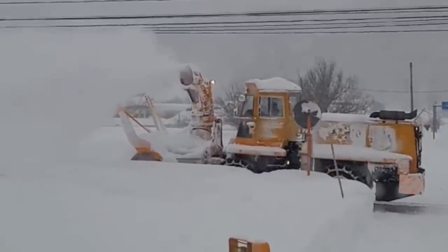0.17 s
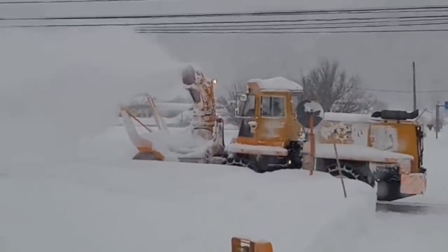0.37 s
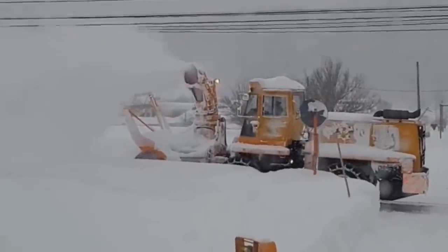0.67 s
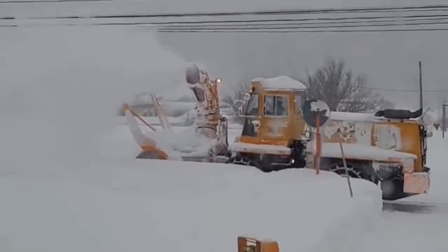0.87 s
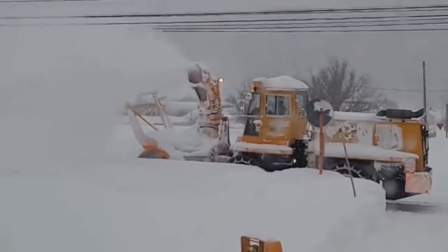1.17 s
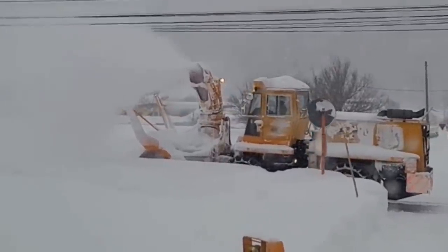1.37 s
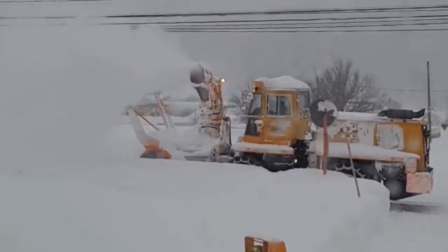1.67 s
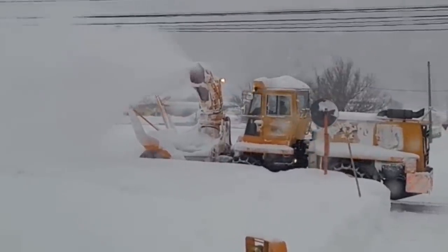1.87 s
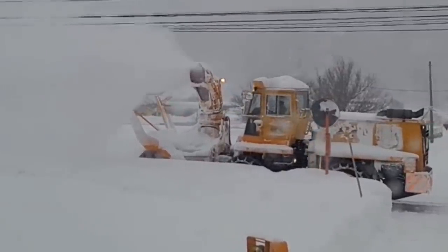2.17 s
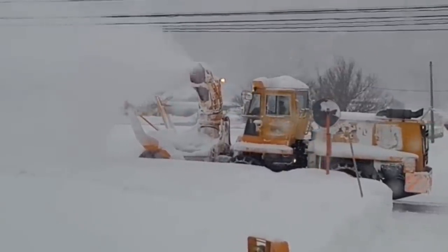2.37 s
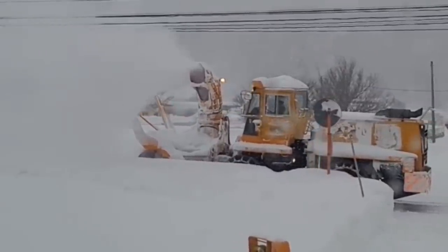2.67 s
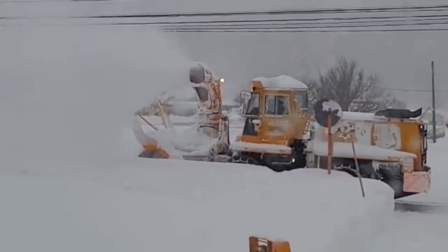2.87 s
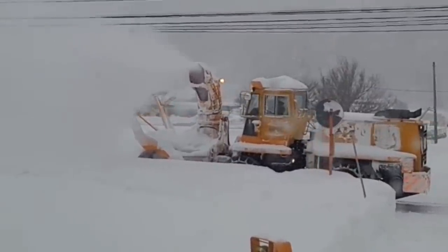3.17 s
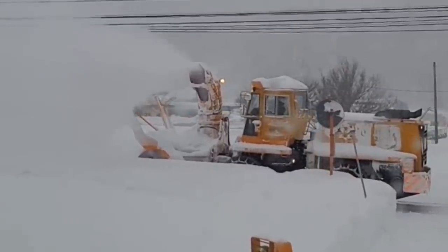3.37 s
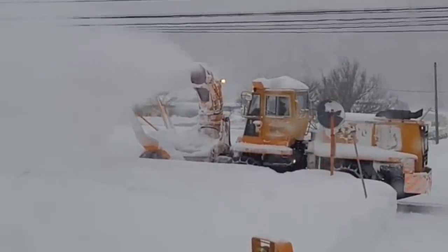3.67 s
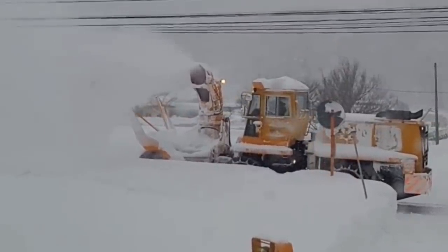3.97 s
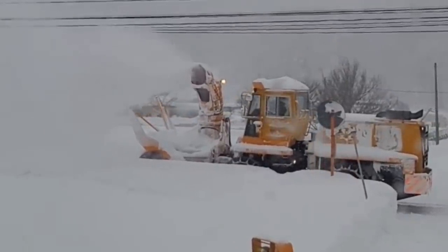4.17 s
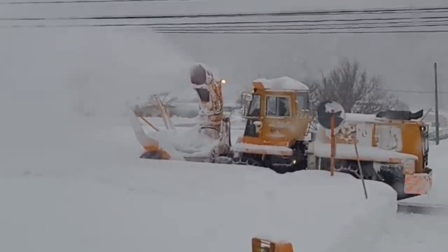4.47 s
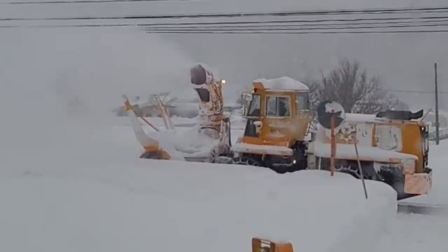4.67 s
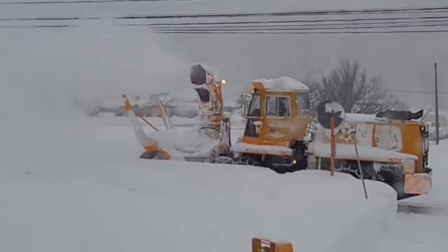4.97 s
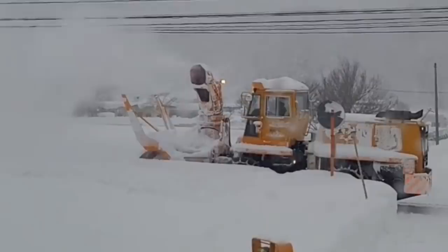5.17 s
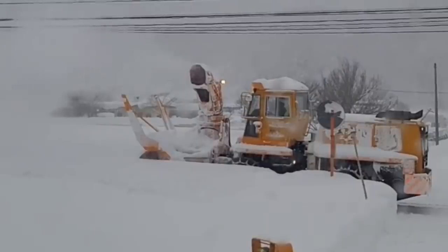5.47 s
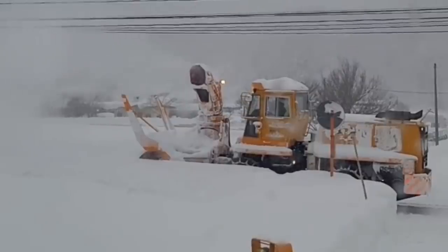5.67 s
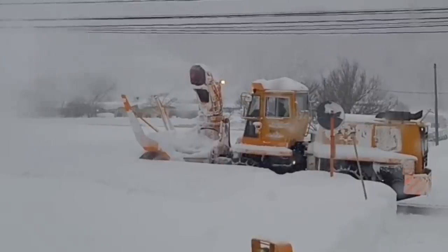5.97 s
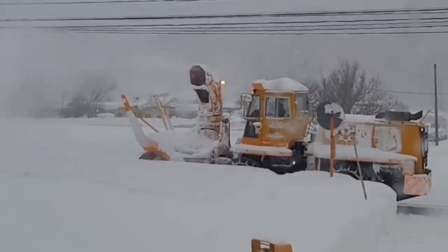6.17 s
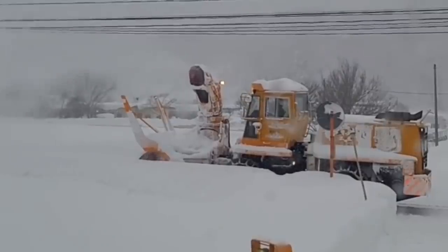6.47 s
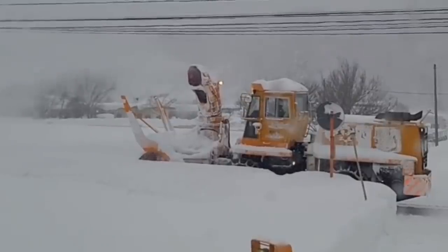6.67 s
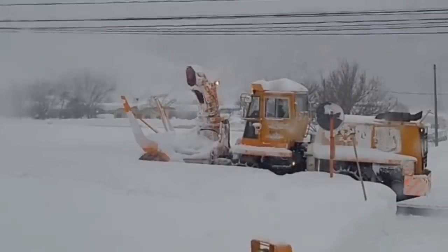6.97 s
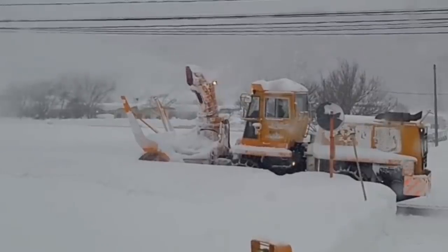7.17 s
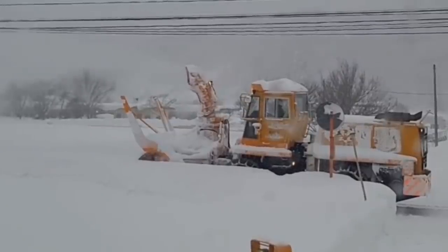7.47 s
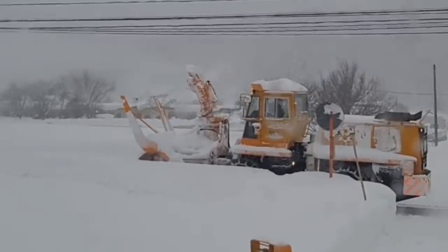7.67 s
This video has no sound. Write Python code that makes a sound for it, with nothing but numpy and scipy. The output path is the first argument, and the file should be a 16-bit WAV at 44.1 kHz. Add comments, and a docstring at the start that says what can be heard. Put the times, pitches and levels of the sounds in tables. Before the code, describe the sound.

Inside an idling car, a rotary snowblower's heavy diesel drones steadily outside with a soft roar of thrown snow, while the flasher relay ticks and tocks.

```python
"""From the start a rotary snowblower works at governed speed, heard from a waiting car: its
twelve-cylinder diesel drones as summed crank orders, with exhaust rumble and the roar and hiss of
thrown snow as coloured noise, while the impeller hums and a thin whine wavers. The car's idle throbs
against the drone five or six times a second. At once the flasher relay ticks, then tocks, as noise
bursts with a spring ring; from half a second on, stray snow grains tap faintly on the glass."""
import sys
import numpy as np
from scipy import signal
from scipy.fft import rfft, irfft, next_fast_len
from scipy.io import wavfile
from scipy.ndimage import uniform_filter1d, map_coordinates

SR = 44100
rng = np.random.default_rng(int(sys.argv[2]) if len(sys.argv) > 2 else 0)


def wav_out(sig):
    """Save sig, one row per channel (or a flat mono array), as 16-bit PCM at SR to the path in sys.argv[1]."""
    wavfile.write(sys.argv[1], SR, np.round(np.clip(np.atleast_2d(sig).T, -1, 1) * 32767).astype(np.int16))


N = 345303

# instant at which every running angle is zero, so both engines push nearly together
THROB_S = 3.366
# governed diesel speed (turns a second)
CRANK_HZ = 27.512
# course changes of each speed (knots a second)
STRAY_RATE_HZ = 1.2

# Standing waves in the cabin reach one side sooner.
# Each row: frequency in Hz, phase by which the left leads in radians.
PHASE_LEADS = [(40, 0.32), (105, 0.15), (150, -0.5), (160, 0.74), (165, 1.06), (177, -0.5), (215, -1.3),
               (230, 1), (290, -1), (340, 0.8), (400, -1.5), (460, -0.6), (495, -1.5), (530, 0),
               (660, 0.52), (720, -1.13), (1000, -2.5), (1300, -1.5), (2000, -1.7), (5000, 0)]


def amp(db):
    """Decibels to gain."""
    return 10 ** (np.asarray(db) / 20)


def unit(x):
    """x at rms 1."""
    return x / np.sqrt(np.mean(x ** 2) + 1e-20)


def along(points, hz):
    """(Hz, value) points interpolated on a log frequency axis."""
    point_hz, values = np.transpose(points)
    return np.interp(np.log(hz + 1), np.log(point_hz), values)


def colour(points, hz):
    """Gain of a (Hz, dB) spectrum that falls away steeply beyond its ends."""
    upper_skirt = 1 / np.hypot(1, (hz / (points[-1][0] * 1.15)) ** 8)
    lower_skirt = 1 / np.hypot(1, (points[0][0] * .8 / (hz + 1)) ** 4)
    return amp(along(points, hz)) * upper_skirt * lower_skirt


def filtered(x, response):
    """x times a response of frequency, applied by FFT."""
    n = x.shape[-1]
    m = next_fast_len(n + SR // 2)
    hz = np.fft.rfftfreq(m, 1 / SR)
    return irfft(rfft(x, m) * response(hz), m)[..., :n]


def wobble(rate_hz):
    """A smooth random curve, rate_hz knots a second."""
    at = np.linspace(0, rate_hz * N / SR, 2000)
    coarse = map_coordinates(rng.standard_normal(1000), [at], mode="wrap")
    return np.interp(np.arange(N), np.linspace(0, N, len(at)), coarse)


def curves(rows):
    """One value per sample for each column after the time."""
    s, *columns = np.transpose(rows)
    return [np.interp(np.arange(N) / SR, s, column) for column in columns]


def angle(hz, stray_hz):
    """Running angle in radians of something that turns at a nearly steady speed."""
    turns = np.cumsum(hz + stray_hz * wobble(STRAY_RATE_HZ)) / SR
    return 2 * np.pi * (turns - turns[round(THROB_S * SR)])


def pan(left_over_right_db):
    """Left and right gains for a level difference."""
    return amp(np.array([[left_over_right_db], [-left_over_right_db]]) / 2)


def tone(phase, side_db, flutter, rate_hz, lead_rad=0):
    """A stereo line, rms 1 before panning; scattered sound makes its level and phase flutter."""
    swell = flutter * wobble(rate_hz)
    slip = flutter * wobble(rate_hz)
    sides = np.array([phase + lead_rad / 2, phase - lead_rad / 2])
    return pan(side_db) * unit((1 + swell) * np.cos(sides) + slip * np.sin(sides))


def rush(spectrum, patchy_db):
    """Stereo noise of rms 1 with patches of random gain, coloured and spread by the cabin."""
    # Each row: frequency in Hz, left over right in dB.
    side_levels = [(40, -3.5), (150, -1), (215, -5.5), (290, -2.5), (370, 5), (460, -14), (750, -2.5),
                   (1300, -5), (1700, -9), (2200, 1.5), (3000, -1), (3900, -4), (5200, 1), (6800, -4),
                   (8000, 1), (10000, -4)]
    # Each row: frequency in Hz, left-right correlation (-1 to 1).
    alike = [(40, 0.96), (90, 0.9), (145, 0.86), (185, 0.54), (230, 0.8), (300, 1), (450, 0.59),
             (670, 0.53), (1000, 0.31), (2200, 0.15), (5000, 0.1), (11000, 0.29)]
    z = signal.stft(rng.standard_normal((2, N)), nperseg=512)[2]
    field = uniform_filter1d(rng.standard_normal(z.shape[1:]), size=6, axis=0)
    field = uniform_filter1d(field, size=14, axis=1)
    pair = signal.istft(z * amp(patchy_db * unit(field)), nperseg=512)[1][:, :N]

    def mid_side(hz):
        turn = np.arccos(np.clip(along(alike, hz), -1, 1)) / 2
        return colour(spectrum, hz) * np.array([np.cos(turn), np.sin(turn)])

    def cabin(hz):
        level = amp(np.outer([.5, -.5], along(side_levels, hz)))
        return level * np.exp(1j * np.outer([.5, -.5], along(PHASE_LEADS, hz)))

    mid, side = filtered(pair, mid_side)
    return unit(filtered(np.array([mid + side, mid - side]), cabin))


def standing_waves(hz, depth_db, spacing_hz):
    """Random peaks and dips from reflections on each side, nearing depth_db in the treble."""
    knots = rng.standard_normal((2, 2000))
    ripple = np.array([map_coordinates(k, [hz / spacing_hz], mode="wrap") for k in knots])
    return amp(depth_db * ripple * hz / (hz + 1500))


def diesel(crank, flutter=0.15, scatter_hz=520):
    """Crank orders: the shorter the wave, the more it flutters on its way into the cabin."""
    # Each row: multiple of crank speed, level in dB before scatter loss and swell, left over right in dB.
    orders = [(1.0, -56, -2.5), (1.5, -29.3, -1.8), (2.25, -56.5, -2), (3.0, -46.1, -0.3),
              (3.5, -47.9, -0.7), (4.25, -57, -1), (4.5, -50, -2.9), (5.5, -48.5, 0.3), (6.0, -41.6, -1.5),
              (6.5, -62, -3), (7.5, -60, -4), (8.5, -58.5, -7.6), (12.0, -45.6, -0.6), (14.5, -66, -1.8),
              (15.0, -66, -3), (16.0, -62, 1.7), (16.5, -65, -8.7), (18.0, -55.8, -5.4),
              (24.0, -55.8, -1.0), (30.0, -65, -1.4), (36.0, -75, -3.8), (37.5, -73, -4),
              (42.0, -60.5, -8.5), (43.5, -65, -9.6), (48.0, -55.5, -8.8), (49.5, -72, -6),
              (54.0, -67, -8.4), (56.0, -59.3, -9.2), (60.0, -69.5, -14.0), (66.0, -72, -5.5),
              (70.5, -70.6, -11.7), (72.0, -69.4, -1.9)]
    # Firing note and two overtones swell as the machine creeps on.
    # Each row: time in seconds, gains of orders 6, 12 and 18 in dB.
    swells = [(.2, 2.5, 2.2, 4), (.7, 2.5, 1.1, 1.5), (1.3, -1, 0.4, -0.5), (2, 1.7, -2.5, 4.5),
              (2.7, -3.5, 2.5, 3.5), (3.4, -1.5, 0.1, 1.5), (4.1, -2.5, -1.5, -7), (4.7, -1, -0.5, -5),
              (5.3, -3, 0.4, -11.5), (6, 5, -3.5, 4), (6.7, -4, 2, -1), (7.5, -1, -0.5, 5)]
    # Two strong high overtones fade in and out.
    # Each row: time in seconds, gains of orders 42 and 48 in dB.
    high_swells = [(.05, 7, 3), (.4, 8.5, 6), (.85, 5.5, -1.5), (1.15, 5, 1.5), (1.42, -5, 3.5),
                   (1.8, 6.5, -1.5), (2.2, 3.5, 0.5), (3, 2, 1.5), (4.1, -2.5, 1), (5, 3.5, 2.5),
                   (5.9, 2.5, 1), (6.4, 4.5, 1.5), (7.5, -0.5, 1.5)]
    swell_db = dict(zip((6, 12, 18, 42, 48), curves(swells) + curves(high_swells)))
    out = np.zeros((2, N))
    for multiple, db, side_db in orders:
        hz = multiple * CRANK_HZ
        scatter = hz / (hz + scatter_hz)
        if multiple < 2:
            spread_rad = 0  # deepest orders keep in step
        elif multiple >= 42 and multiple % 6 == 0:
            spread_rad = 1.5  # high firing overtones nearly so: they buzz
        else:
            spread_rad = np.pi
        phase = multiple * crank + spread_rad * rng.uniform(-0.99, 1)
        line = tone(phase, side_db, flutter * scatter, 2.426 + 9 * scatter, along(PHASE_LEADS, hz))
        out += amp(db - .5 * scatter + swell_db.get(multiple, 0)) * line
    return out


def exhaust(crank, depth=0.12):
    """Gas leaves the pipe in puffs, six to a turn of the crank, and booms in the cabin."""
    # Each row: frequency in Hz, relative density in dB per Hz.
    rumble = [(28, -21.5), (37, -12), (55, -10.5), (75, -9), (95, -3), (112, -8.5), (127, -10), (140, 1),
              (160, 3), (173, -15), (196, -15), (208, -9.5), (235, -9.5), (258, -5.5), (285, -13),
              (345, -8), (540, -33.5)]
    puffs = np.cos(6 * crank)
    return amp(-36.5) * unit((1 + depth * puffs) * rush(rumble, patchy_db=.5))


def snow(crank, rasp_depth=.045):
    """Auger, chute and flying snow roar and hiss with the load, rasping at the firing rate."""
    # Roar through the glass. Each row: frequency in Hz, relative density in dB per Hz.
    roar_colour = [(420, -24), (490, -18), (560, -27), (650, -22), (720, -24), (860, -20.5), (970, -24.5),
                   (1060, -26.5), (1170, -24), (1240, -18), (1300, -25.5), (1400, -27.5), (1455, -21.5),
                   (1505, -26.5), (1600, -18), (1745, -30), (1850, -26), (2010, -28.5), (2080, -35),
                   (2220, -32), (2500, -34), (2950, -36), (4150, -37.5), (4450, -50)]
    # Fine hiss. Each row: frequency in Hz, relative density in dB per Hz.
    hiss_colour = [(3800, -58), (4500, -50.5), (5250, -43), (5900, -55.5), (7000, -53.5), (8300, -61.5),
                   (9300, -67.5), (11000, -65), (12500, -68.5)]
    firing = 1 + rasp_depth * np.cos(6 * crank)
    load_db = 0.27 * wobble(1.5)
    roar = amp(-45.0 + load_db) * rush(roar_colour, patchy_db=1.0)
    hiss = amp(-70.0 + load_db) * rush(hiss_colour, patchy_db=1.5)
    return firing * filtered(roar + hiss, lambda hz: standing_waves(hz, depth_db=4, spacing_hz=32))


def impeller(blade_hz=104.05, stray_hz=.2):
    """The blades that throw the snow give one steady hum at their passing rate."""
    blades = angle(blade_hz, stray_hz)
    return amp(-38.0) * tone(blades, side_db=-2.0, flutter=0.035, rate_hz=1.4, lead_rad=0.11)


def whine(pitch_hz=1542, stray_hz=4):
    """A thin, wavering whine from the machine beats against the diesel's order 56."""
    phase = angle(pitch_hz, stray_hz)
    return amp(-60) * tone(phase, side_db=-6.0, flutter=0.22, rate_hz=6.4, lead_rad=-0.68)


def idle(firing_hz=35.648, stray_hz=.02, hunt_depth_hz=.1, hunt_period_s=7.3):
    """The car's firing note hunts slowly just under the diesel's order 1.5, so the two throb."""
    t = np.arange(N) / SR
    hunt_hz = hunt_depth_hz * np.sin(2 * np.pi * (t - THROB_S) / hunt_period_s)
    phase = angle(firing_hz + hunt_hz, stray_hz)
    return amp(-40.5) * tone(phase, side_db=-1.5, flutter=0.17, rate_hz=1.5, lead_rad=0.33)


def clicks(rows, spectrum, housing_t60_s, bounce_s, bounce_db, count=3):
    """The armature chatters, bounces once, and rings spring and housing, each blow a little different."""
    rise_s, chatter_s = .002, .003
    crack_db, crack_t60_s = 2.5, .016  # each contact over the blow
    spring_hz, spring_t60_s = 4170, .1
    t = np.arange(N) / SR
    out = np.zeros((2, N))

    def housing(hz):
        return colour(spectrum, hz) * standing_waves(hz, depth_db=3.5, spacing_hz=172.6)

    def decay(age, t60_s):
        return amp(-60 * np.maximum(age, 0) / t60_s) * np.exp(np.minimum(age, 0) / rise_s)

    for s, db, ring_db in rows:
        near = abs(t - s) < .2
        age = t[near] - s
        contacts = [(k * chatter_s * rng.uniform(.8, 1.2), 0) for k in range(count)]
        contacts.append((bounce_s * rng.uniform(.9, 1.1), bounce_db))
        crack_power = sum((amp(crack_db + over_db) * decay(age - delay_s, crack_t60_s)) ** 2
                          for delay_s, over_db in contacts)
        envelope = np.sqrt(crack_power + decay(age, housing_t60_s) ** 2)
        blow = envelope * unit(filtered(rng.standard_normal((2, len(age))), housing))
        hz = spring_hz + rng.normal(0, 50, (2, 1))
        spring = amp(ring_db) * decay(age, spring_t60_s) * np.sin(2 * np.pi * hz * age)
        out[:, near] += amp(db) * (blow + spring)
    return out


def relay():
    """Contacts close with a bright tick and open with a duller tock, never quite evenly."""
    # Each row: time in seconds, blow level in dB before the common trim, spring ring over blow in dB.
    closings = [(.017, -51, 0), (.749, -51.5, -12), (1.484, -53, -12), (2.221, -51, -11), (2.956, -53, -3),
                (3.683, -53.5, -4), (4.409, -50.5, -4), (5.139, -53.5, -13), (5.872, -53.5, -19),
                (6.612, -51, -6), (7.346, -52.5, -9)]
    # Each row: time in seconds, blow level in dB before the common trim, spring ring over blow in dB.
    openings = [(.416, -49.5, 3), (1.146, -49.5, -6), (1.889, -51.5, -15), (2.622, -49.5, -10),
                (3.350, -49.5, -2), (4.077, -50, -7), (4.805, -48.5, -14), (5.540, -51.5, -5),
                (6.280, -51, 0), (7.013, -51.5, 1), (7.755, -49, -9)]
    # Closing spectrum. Each row: frequency in Hz, relative level in dB.
    tick_colour = [(1200, -18.5), (2500, -1), (3400, 3), (4150, 5), (4550, -14.5), (5000, -5),
                   (6100, -14.5), (7300, -13), (9200, -25), (11200, -23), (13000, -32.5)]
    # Opening spectrum. Each row: frequency in Hz, relative level in dB.
    tock_colour = [(1200, -24.5), (2200, 1), (3400, 0.5), (3800, -3.5), (4150, 3.5), (4600, -23),
                   (7000, -23), (9200, -36.5), (13000, -36.5)]
    tick = clicks(closings, tick_colour, housing_t60_s=.16, bounce_s=.013, bounce_db=0)
    tock = clicks(openings, tock_colour, housing_t60_s=.13, bounce_s=.0125, bounce_db=2)
    return amp(-2) * pan(-2.1) * (tick + tock)


def taps(rise_s=.002, t60_s=.07):
    """Now and then a grain of snow ticks against the glass: a short burst of bright noise."""
    # Each row: time in seconds, level in dB before the common trim.
    grains = [(.569, -68.5), (1.319, -64.5), (3.129, -67.5), (3.569, -68.5), (6.087, -68), (6.309, -58.5),
              (6.359, -66), (6.929, -67.5)]
    # Tap spectrum. Each row: frequency in Hz, relative level in dB.
    tap_colour = [(3000, -1), (5200, 0), (8000, -0.5), (11500, -4.5)]
    t = np.arange(N) / SR
    envelope = np.zeros(N)
    for s, db in grains:
        rise = np.exp(np.clip(t - s, -1, 0) / rise_s)
        envelope += rise * amp(db - 60 * np.clip(t - s, 0, 1) / t60_s)
    return amp(-7) * envelope * rush(tap_colour, patchy_db=1.5)


def scene():
    """The snowblower outside, the car around the listener."""
    crank = angle(CRANK_HZ, stray_hz=.018)
    machine = diesel(crank) + exhaust(crank) + snow(crank) + impeller() + whine()
    return machine + idle() + relay() + taps()


def record(dry, top_hz=12900):
    """Fade both ends over 3 ms and keep nothing above the band limit."""
    t = np.arange(N) / SR
    fade = np.clip(np.minimum(t, t[-1] - t) / .003, 0, 1)
    return filtered(dry * fade, lambda hz: hz < top_hz)


dry = scene()
out = record(dry)
wav_out(out)
```